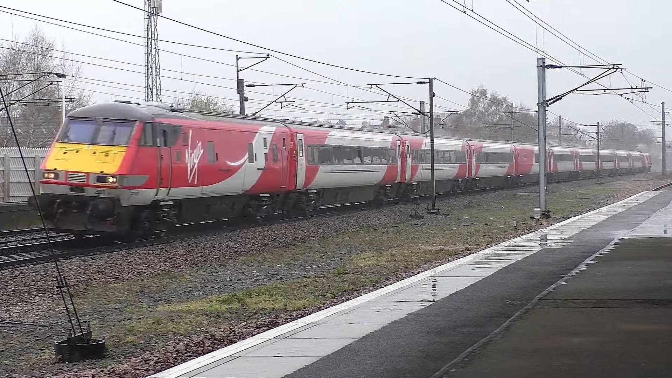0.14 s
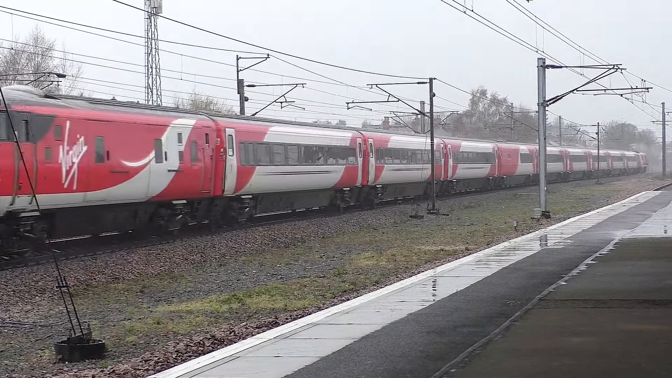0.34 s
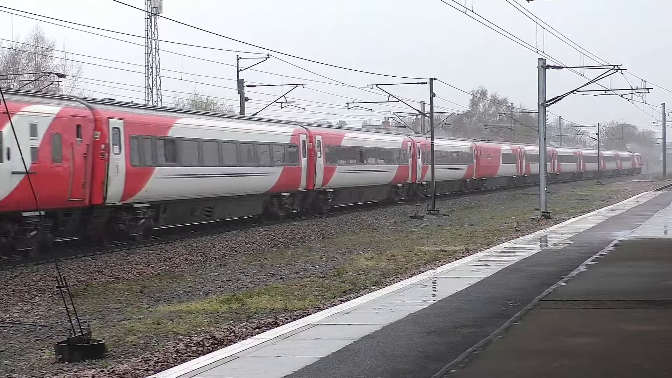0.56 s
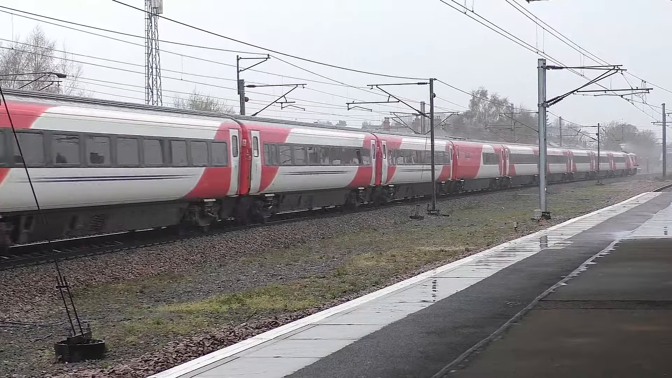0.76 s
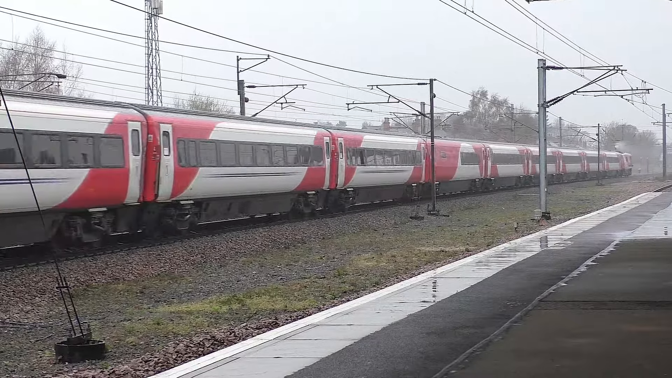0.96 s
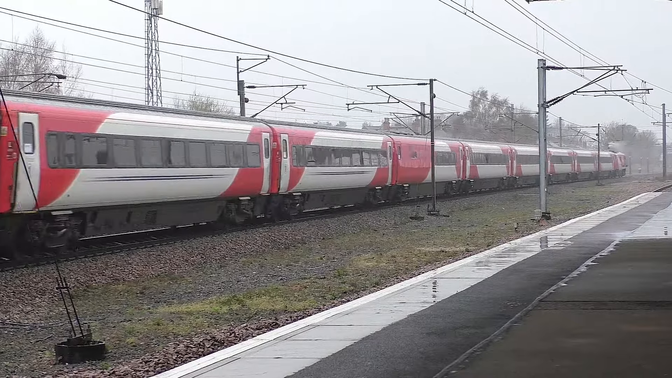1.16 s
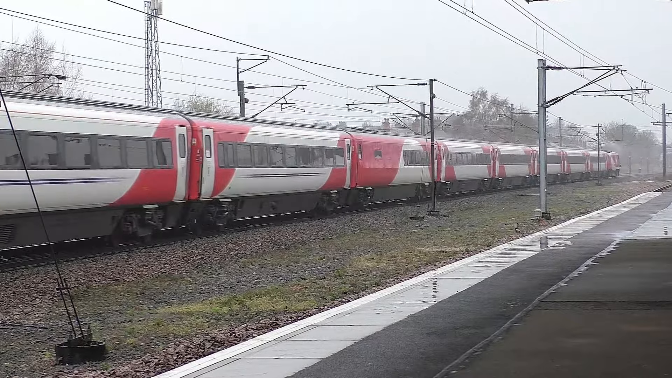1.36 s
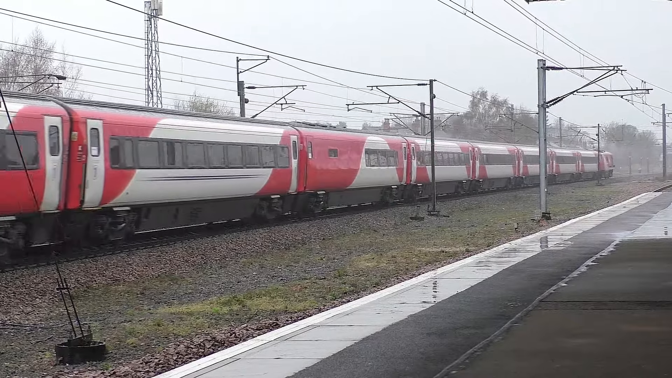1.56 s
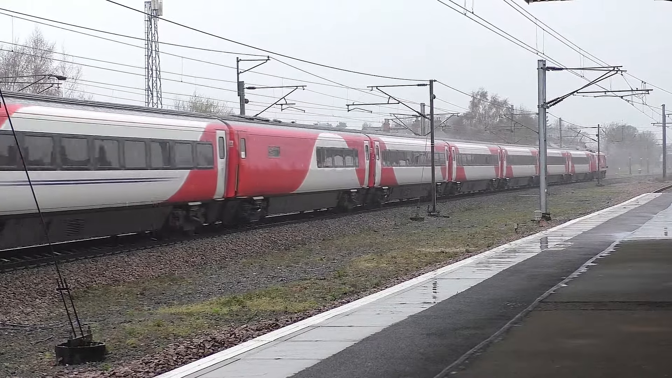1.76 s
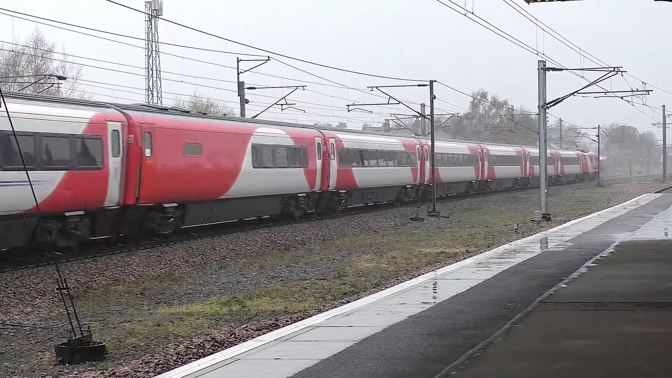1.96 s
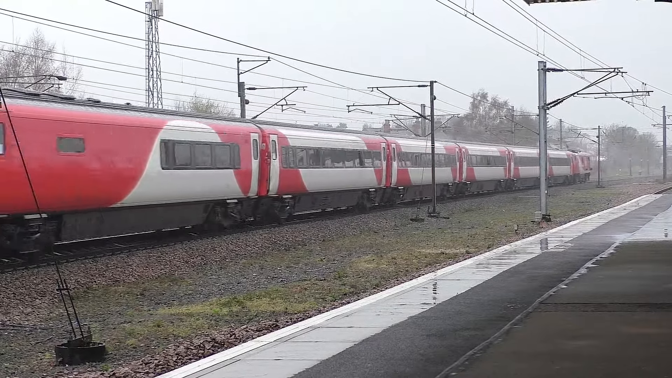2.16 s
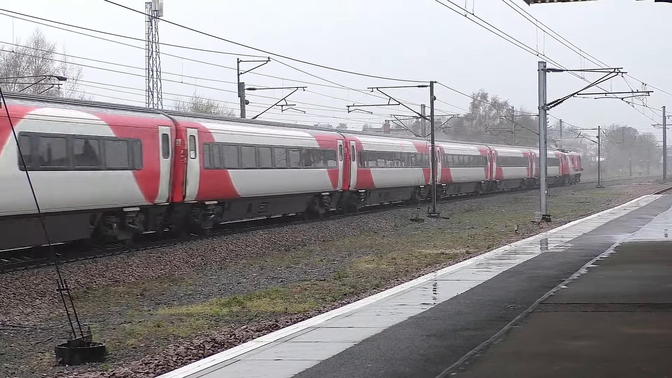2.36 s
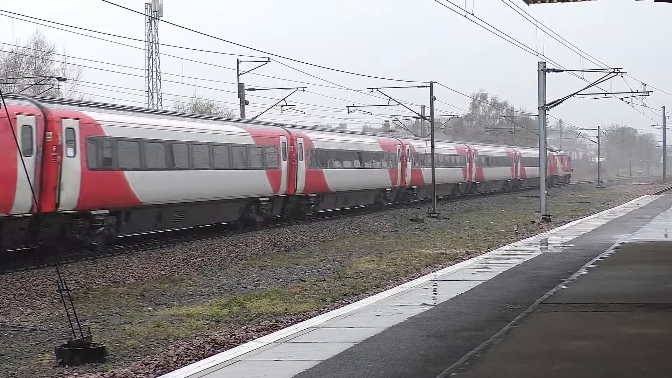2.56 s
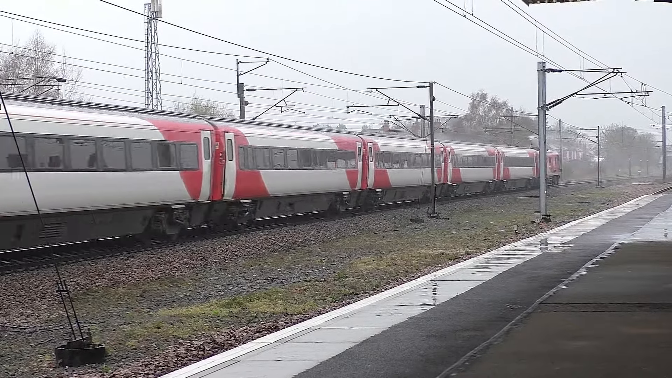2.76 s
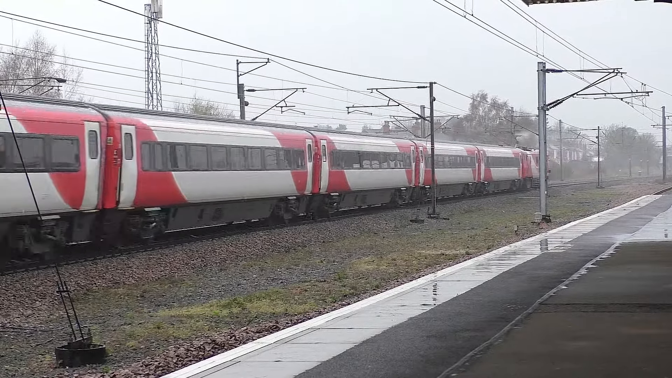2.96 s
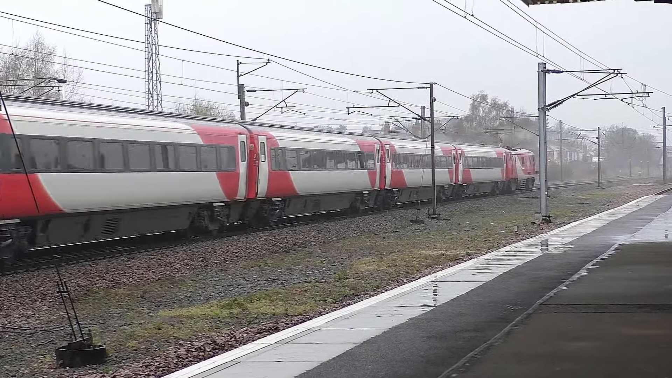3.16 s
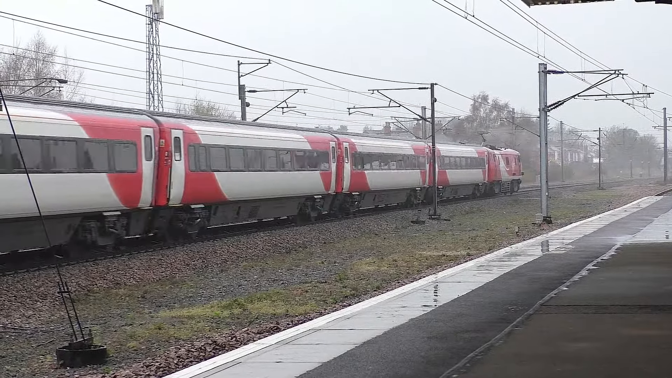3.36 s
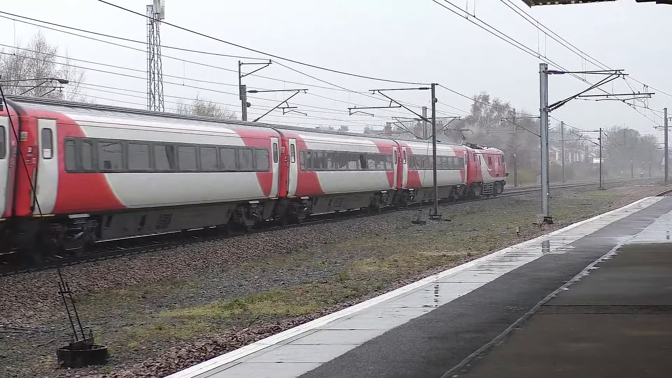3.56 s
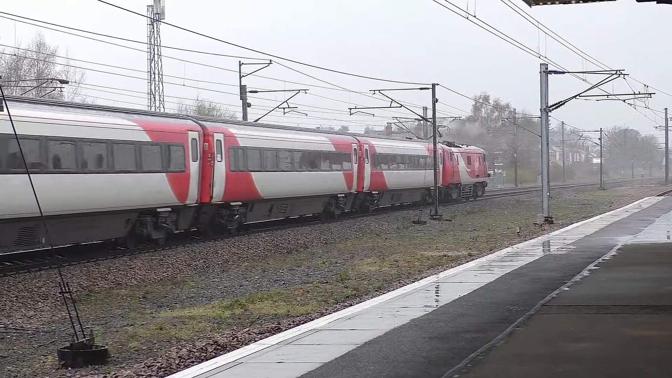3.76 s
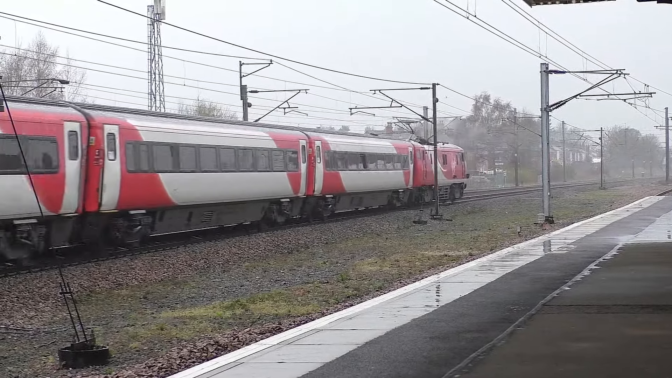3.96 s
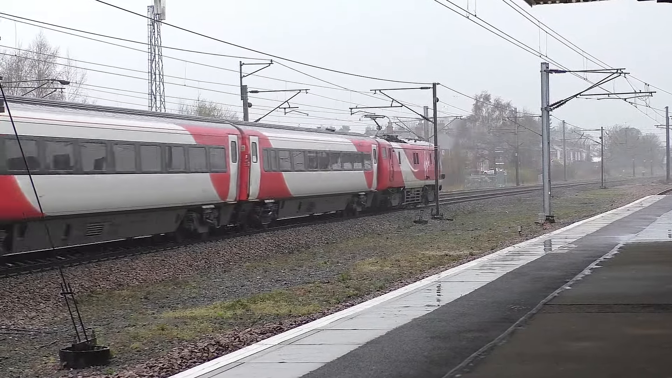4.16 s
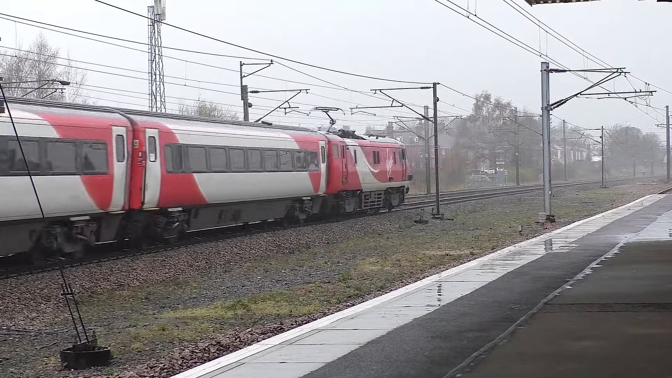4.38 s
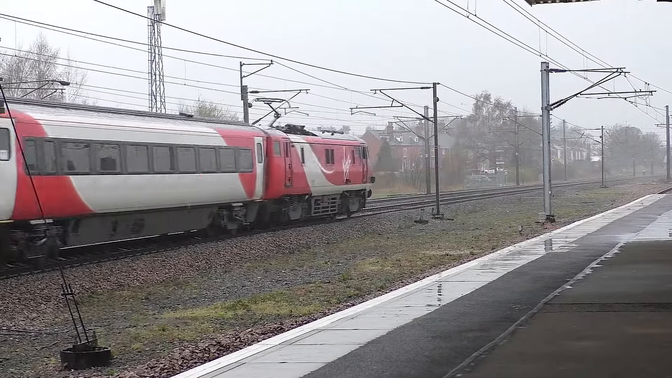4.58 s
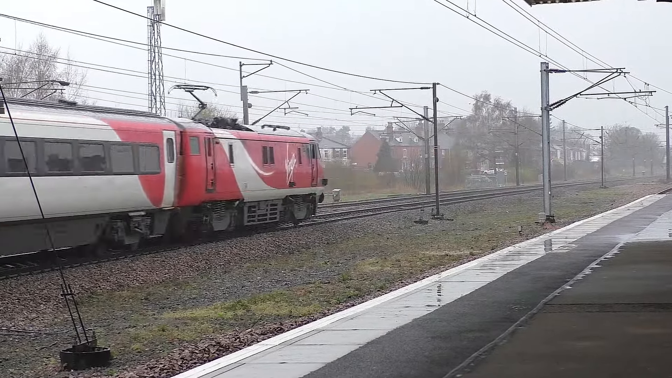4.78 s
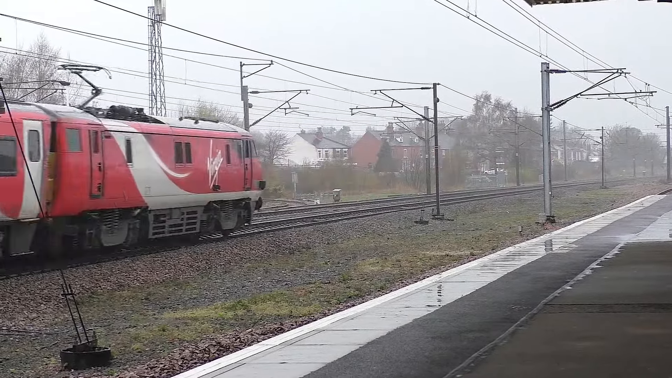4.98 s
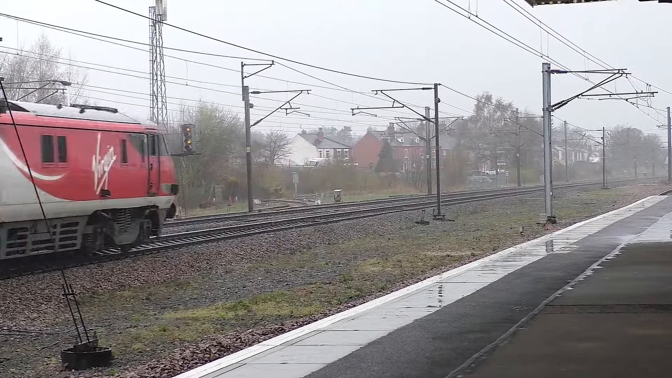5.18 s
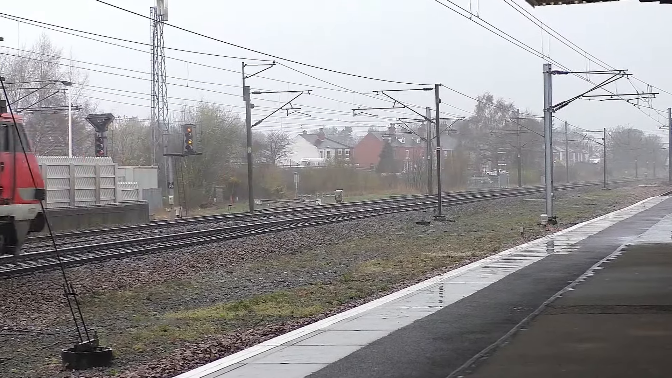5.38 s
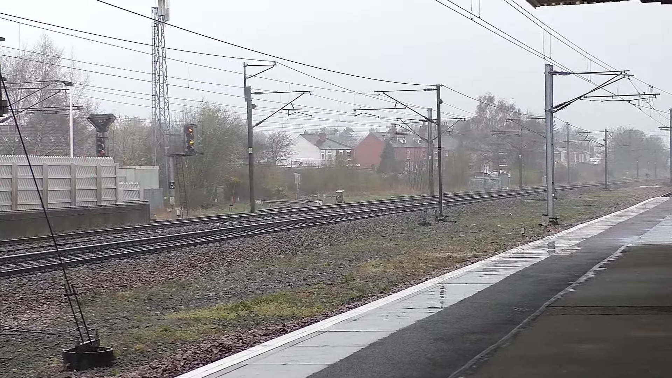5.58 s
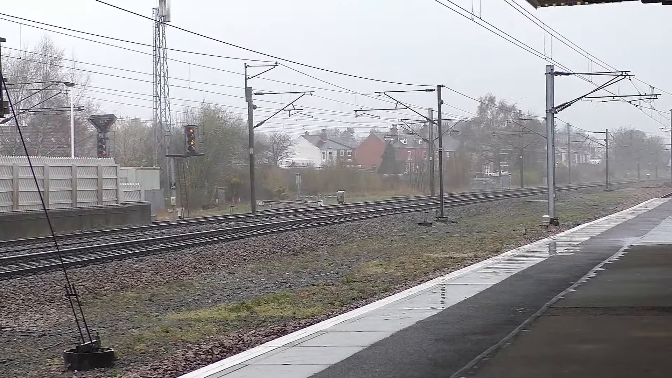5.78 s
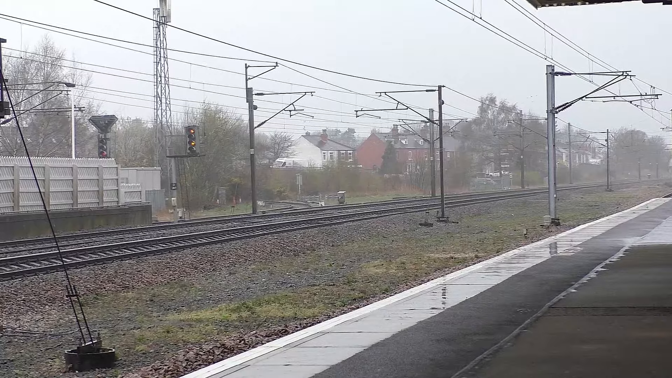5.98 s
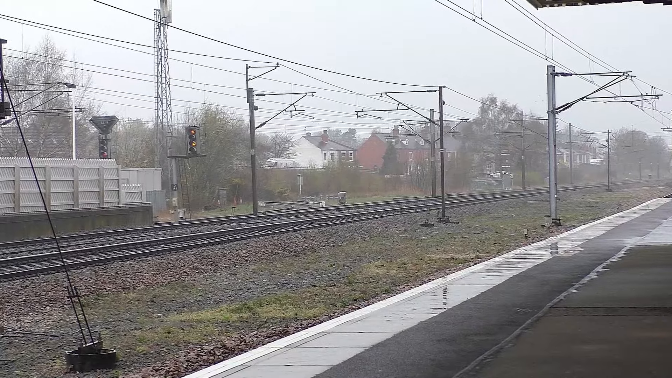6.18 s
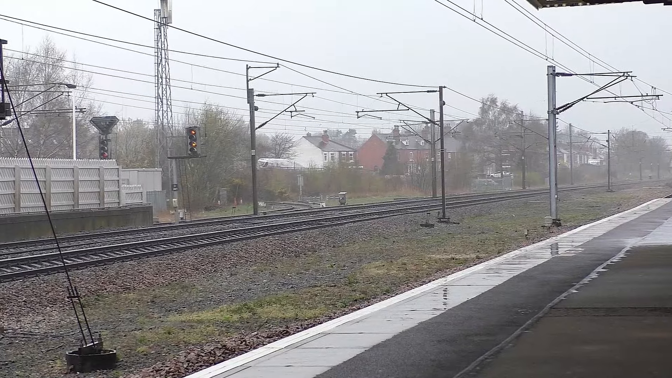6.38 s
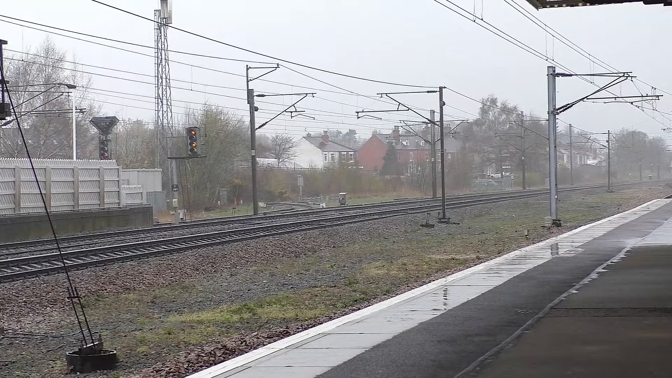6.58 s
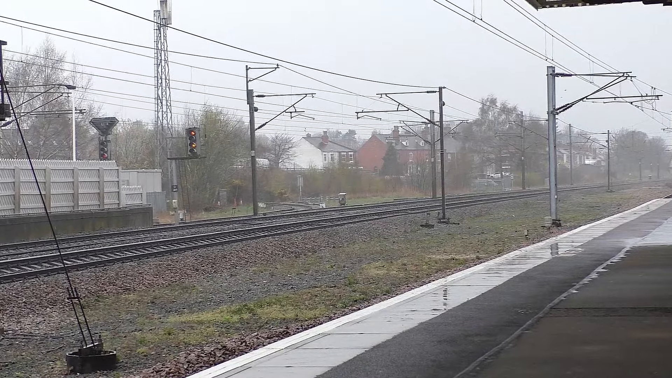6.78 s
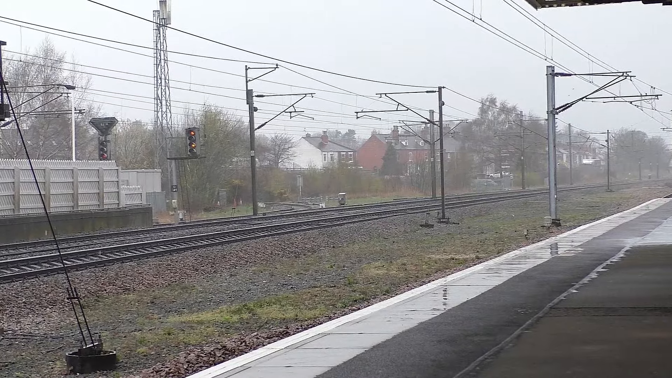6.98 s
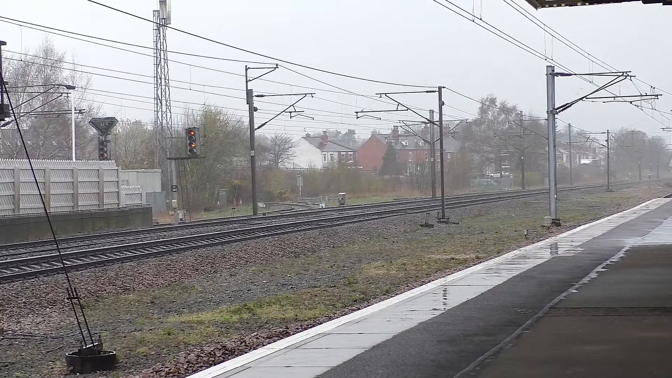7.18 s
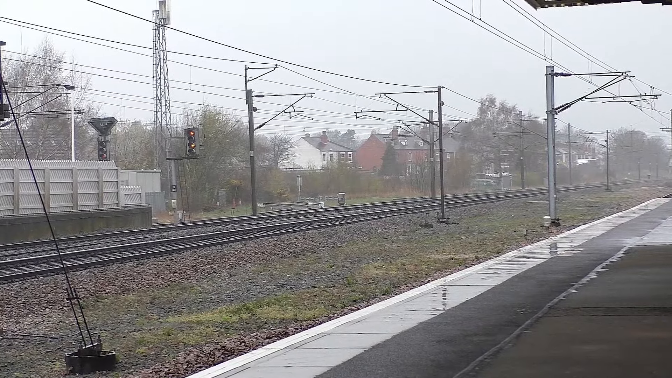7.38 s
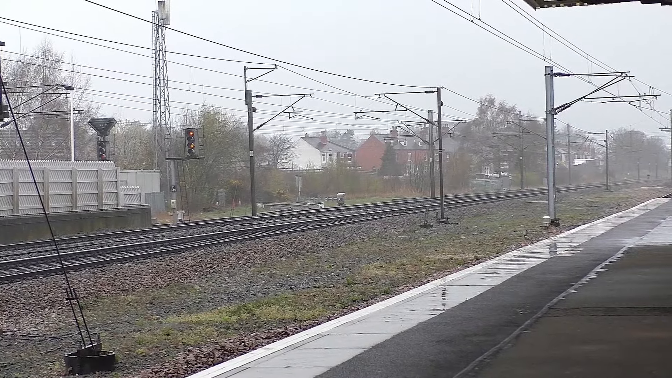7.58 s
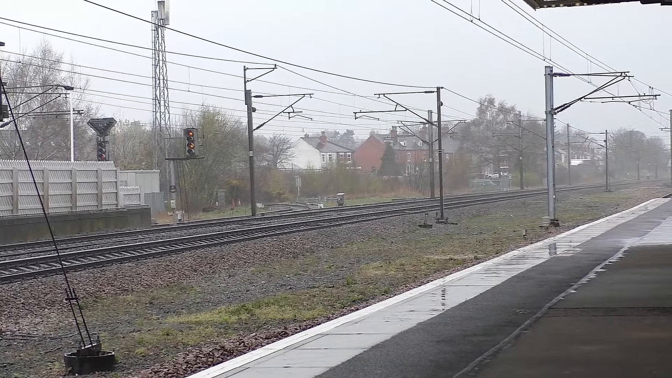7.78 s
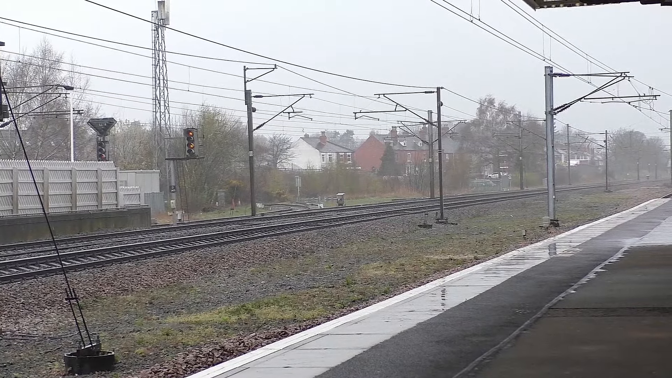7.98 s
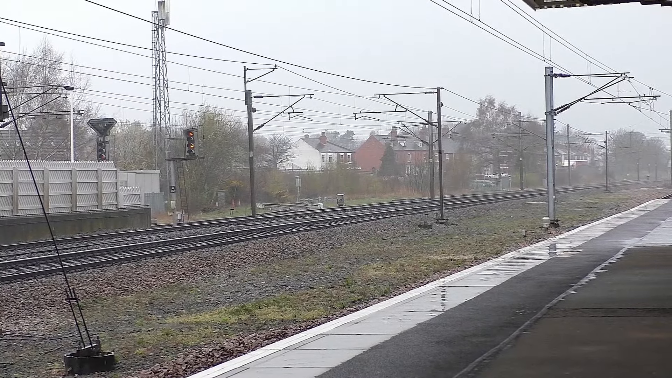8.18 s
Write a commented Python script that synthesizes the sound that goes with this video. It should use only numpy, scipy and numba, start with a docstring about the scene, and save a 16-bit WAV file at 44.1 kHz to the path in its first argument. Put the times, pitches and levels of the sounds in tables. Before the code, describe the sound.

Heard from an open station platform, a fast train approaches and passes with a loud roar of rails and a low rush of air. Spray hisses while the wheels sing in overlapping metallic tones that fall as each set goes by. A brief high squeak and a second gust mark the end of the train. The noise then dies down to faint hums over a soft wash of light rain.

```python
"""Light rain falls on a wet platform as an express train bears down, rough contact setting its rails
roaring and its wheels singing. At 1 s the nose passes in a rumble of air; spray hisses, and bogie after
bogie glides down in pitch as it goes by. Under the rear half the near rail holds one note.
At 5.8 s the tail passes with one short squeak and another rush of air, and the train draws away humming."""
import sys
import numpy as np
from scipy import signal
from scipy.fft import rfft, irfft, next_fast_len
from scipy.io import wavfile
from scipy.ndimage import uniform_filter1d
from numba import njit

SR = 44100
rng = np.random.default_rng(int(sys.argv[2]) if len(sys.argv) > 2 else 0)


def master_out(mix):
    """Clip the mix to full scale and print it as 16-bit PCM to the path in sys.argv[1]."""
    frames = np.transpose(np.atleast_2d(mix))
    ceiling = np.clip(frames, -1, 1)
    pcm = np.round(ceiling * 32767).astype(np.int16)
    wavfile.write(sys.argv[1], SR, pcm)


N = 363455
FFT_SIZE = next_fast_len(N)
TIME_S, BIN_HZ = np.arange(N) / SR, np.arange(FFT_SIZE // 2 + 1) * SR / FFT_SIZE
SPEED_M_PER_S, SOUND_M_PER_S, TRACK_M = 46., 343, 27.
NOSE_S, TAIL_S, COACHES_GONE_S = 1, 5.8, 5.13  # when each passes the listener


def undb(db):
    return 10 ** (np.asarray(db) / 20)


def unit_rms(x):
    return x / np.sqrt(np.mean(x ** 2))


def curve(times_s, values):
    return np.interp(TIME_S, times_s, values)


def over_hz(table, column=1):
    """A table column at every frequency bin, joined on a log axis."""
    table = np.array(table)
    return np.interp(np.log(BIN_HZ + 1), np.log(table[:, 0] + 1), table[:, column])


def shaped_noise(gain):
    """Two unrelated noises of one spectrum, at unit RMS."""
    white = rfft(rng.standard_normal((2, FFT_SIZE)))
    return unit_rms(irfft(white * gain, FFT_SIZE)[:, :N])


def coloured_noise(spectrum):
    return shaped_noise(undb(over_hz(spectrum)))


@njit
def bandpass(x, hz, width_hz):
    """State-variable filter with unity gain at its moving centre."""
    y = np.empty_like(x)
    for c in range(len(x)):
        band, low = 0., 0.
        for i in range(len(hz)):
            g, damping = np.pi * hz[i] / SR, width_hz / hz[i]
            g += g ** 3 / 3
            v = (band + g * (x[c, i] - low)) / (1 + g * (g + damping))
            band, low = 2 * v - band, low + 2 * g * v
            y[c, i] = damping * v
    return y


def wander(rate_hz):
    """Smoothed random steps with a spread near 1."""
    hold = int(SR / rate_hz)
    steps = np.repeat(rng.standard_normal(N // hold + 1), hold)
    return 1.46 * uniform_filter1d(uniform_filter1d(steps, hold), hold)[:N]


def low_cut(x, hz):
    return signal.sosfilt(signal.butter(2, hz, "high", fs=SR, output="sos"), x)


def distance(first_s, last_s):
    """Metres to the nearest part of the stretch of train that passes between two times."""
    return np.hypot(SPEED_M_PER_S * (TIME_S - np.clip(TIME_S, first_s, last_s)), TRACK_M)


def pass_by(nose_db, sides_db, tail_db, ahead, behind):
    """Gain of noise shed by nose, sides and tail; ahead and behind are powers of distance."""
    falloff = curve([NOSE_S, TAIL_S], [ahead, behind])
    parts = ((nose_db, NOSE_S, NOSE_S), (sides_db, NOSE_S, TAIL_S), (tail_db, TAIL_S, TAIL_S))
    gains = [undb(db) * (TRACK_M / distance(a, b)) ** falloff for db, a, b in parts]
    return np.sqrt(sum(gain ** 2 for gain in gains))


def rain():
    """Light rain on the platform, a steady bright wash."""
    # freq_hz, relative_db
    spectrum = [(1900, -23), (2700, 8), (3400, -1), (4200, -3), (7030, -7), (8630, -25), (9360, -33),
                (12500, -16), (14400, -16), (15500, -26)]
    return undb(-48.5) * coloured_noise(spectrum)


def distant_rumble():
    """A faint, steady low bed."""
    spectrum = [(20, -12), (35, -6), (60, -6), (110, -10), (200, -40)]  # freq_hz, relative_db
    return undb(-72) * coloured_noise(spectrum)


def rail_roar():
    """Rough contact shakes the rails: a broad hump of noise with a firmer, wavering core."""
    # Centre of the roar: time_s, pitch_hz
    centre = [(0, 685), (.4, 690), (1.0, 677), (1.5, 802), (3.2, 802), (5.5, 776), (6.1, 720), (8.24, 724)]
    # Core over hump: time_s, level_db
    core_balance = [(0, -3), (.5, -4.5), (1.1, -2), (5.2, -1), (5.8, -7), (6.4, -2.5), (8.24, -7.5)]
    hz = curve(*np.transpose(centre))
    hump = unit_rms(bandpass(bandpass(rng.standard_normal((2, N)), hz, 960.), hz, 1260.))
    core = unit_rms(bandpass(bandpass(rng.standard_normal((2, N)), hz, 400.), hz, 400.))
    share = undb(curve(*np.transpose(core_balance)) + 1.6 * wander(4.7))
    return low_cut(hump + share * core, hz=190) / np.sqrt(1 + share ** 2)


def wheels():
    """All bogies ring the same modes; distance delays each one, so its pitch falls in passing."""
    # Disc and axle modes: pitch_hz, width_hz, level_db, sideways_beaming
    modes = [(513, 83, -10.5, 0.066), (984, 18, -10.5, 0.071), (1702, 91, -3, 0.2), (2286, 310, -0.5, 0.64),
             (2786, 66, -3, 0.28), (3405, 340, -10, 4.2), (4850, 130, -7.5, 11), (5480, 330, -16, 20)]
    # Wheel noise between the modes: freq_hz, relative_db
    rolling_spectrum = [(530, -33), (900, -10), (1350, -8), (1620, 2), (1990, -1.5), (2360, 1.5),
                        (4500, -24.5), (5850, -21), (9900, -120)]
    # Bogie groups: passing_s, kind, ring_db
    bogies = [(.85, "leading car", -0.5), (1.3, "first coach", 1), (1.75, "coach", 3), (2.2, "coach", 3),
              (2.65, "coach", 2.5), (3.2, "coach", 3.5), (3.7, "coach", -1), (4.2, "coach", 1.5),
              (4.7, "coach", 0.5), (5.15, "coach", 1), (5.55, "engine front", 1), (5.9, "engine rear", -2)]
    # Voicing of each kind of bogie: level_db for each mode in turn
    voicing = {"leading car": (10.5, -18, 6, -6, -18, 7, -4, -18),
               "first coach": (-10, -16, 4, 9, 1, 9, -14, -13),
               "coach": (-21, -7, 3.5, 3.5, -1.5, 4.5, -8, -10),
               "engine front": (-11, -2, 4, 2, 0.5, -11, -8, -2),
               "engine rear": (8, 11, -9, 0, -22, -23, -12, -8)}
    rings = [undb(db) * shaped_noise(1 / (1 + (2 * (BIN_HZ - hz) / width_hz) ** 2))
             for hz, width_hz, db, _ in modes]
    rolling = undb(5) * coloured_noise(rolling_spectrum)
    song, power = 0, 0
    for k, (passing_s, kind, ring_db) in enumerate(bogies):
        range_m = distance(passing_s, passing_s)
        facing = TRACK_M / range_m  # cosine of the angle off the axle
        ringing = sum(undb(ring_db + db) * facing ** beaming * ring
                      for db, ring, (*_, beaming) in zip(voicing[kind], rings, modes))
        at_rest = np.roll(ringing + rolling, k * N // len(bogies), axis=1)  # its own stretch of noise
        sent_s = abs(TIME_S - (range_m - TRACK_M) / SOUND_M_PER_S)
        weight = facing ** 1.62
        song += weight * np.array([np.interp(sent_s, TIME_S, x) for x in at_rest])
        power += weight ** 2
    # The weights only balance the bogies against each other.
    return unit_rms(low_cut(song / np.sqrt(power), hz=150))


def sliding_tones(notes, base_width_hz, width_share=0):
    """Narrow bands of noise that swell, slide and fade."""
    noise, tones = rng.standard_normal((2, N)), np.zeros((2, N))
    waver = 1 + .004 * wander(14)
    for start_s, end_s, first_hz, last_hz, peak_db in notes:
        i, j = max(int(start_s * SR), 0), min(int(end_s * SR), N)
        hz = np.linspace(first_hz, last_hz, j - i) * waver[i:j]
        width_hz = float(base_width_hz + width_share * first_hz)
        tone = bandpass(bandpass(noise[:, i:j].copy(), hz, width_hz), hz, width_hz)
        tone *= np.sqrt(2 * SR / (np.pi * width_hz))  # to about unit RMS
        swell = np.abs(np.sin(np.pi * (TIME_S[i:j] - start_s) / (end_s - start_s)))
        tones[:, i:j] += undb(peak_db) * swell * tone
    return tones


def singing():
    """Here and there one wheel or rail sings out of the roar."""
    # Sung notes: start_s, end_s, first_hz, last_hz, peak_db
    notes = [(-.4, .55, 578, 557, -23), (0, 0.63, 1630, 1600, -29), (.5, 0.78, 815, 770, -19.5),
             (-.1, .9, 2600, 2555, -28.5), (.85, 1.2, 2320, 2290, -26), (3.1, 3.35, 1620, 1590, -25),
             (2.75, 3.1, 1800, 1720, -27), (4.4, 4.75, 2380, 2280, -27), (.1, 1.35, 3124, 3080, -29),
             (.3, 1.26, 1860, 1840, -26), (.5, 1.05, 2500, 2380, -24), (.45, 1.03, 615, 596, -23),
             (1.1, 1.48, 1700, 1680, -23.5), (1.4, 2.4, 5900, 5350, -40), (1.75, 2.02, 706, 727, -24),
             (1.8, 2.55, 2000, 1734, -27.5), (2.05, 2.3, 2650, 2380, -32), (2.15, 2.5, 5260, 4700, -31.5),
             (2.2, 2.55, 3700, 3520, -29.5), (2.55, 3.27, 2900, 2510, -28), (2.497, 3.02, 778, 820, -26.5),
             (2.75, 3.34, 4740, 4750, -35), (2.9, 3.3, 5200, 5260, -33), (2.95, 3.3, 3120, 3060, -29),
             (3.05, 3.3, 2300, 2130, -25), (3.25, 3.6, 2260, 2000, -26), (3.15, 3.443, 830, 884, -21.5),
             (3.6, 3.9, 1670, 1660, -24), (4.05, 4.6, 1665, 1630, -28), (4.1, 4.5, 4130, 3950, -29),
             (4.3, 5, 3120, 3050, -32), (5, 5.3, 2610, 2280, -24), (5.15, 5.7, 1900, 1620, -24),
             (5.1, 5.9, 4740, 4720, -37), (5.62, 5.946, 820, 810, -25), (5.65, 5.9, 960, 920, -25),
             (5.4, 6.1, 900, 886, -25), (3.1, 3.35, 2800, 3150, -26), (4.15, 4.4, 2780, 2720, -27),
             (5.05, 5.35, 2800, 2300, -29), (6.2, 6.9, 340, 343, -39.5), (7, 7.5, 443, 460, -37.5),
             (7.55, 8.24, 1470, 1450, -43)]
    return sliding_tones(notes, base_width_hz=43, width_share=.016)


def hums():
    """Narrower tones come and go at either end of the train."""
    # Hummed notes: start_s, end_s, first_hz, last_hz, peak_db
    notes = [(-.4, .45, 578, 570, -25), (.4, 1.15, 1850, 1830, -29), (6.4, 7.3, 710, 700, -35),
             (4.7, 5.95, 412, 403, -30.5), (5.2, 5.75, 1690, 1660, -26), (5.6, 6.3, 480, 478, -28),
             (6.1, 7.5, 866, 855, -32), (6.5, 7.9, 952, 940, -38), (6.9, 8.3, 770, 760, -39),
             (7.3, 8.6, 864, 865, -42)]
    return sliding_tones(notes, base_width_hz=29)


def wet_hiss():
    """A flickering hiss whose lowest band leaves with the coaches."""
    # Hiss colour: freq_hz, relative_db
    spectrum = [(1650, -22.5), (2800, 0.5), (4350, -5.5), (5550, -6), (7590, -14.5), (9000, -31),
                (11700, -58), (19800, -120)]
    hiss = coloured_noise(spectrum)
    low_band = bandpass(hiss, np.full(N, 3150.), 940.)
    gone = 1 - TRACK_M / distance(0, COACHES_GONE_S)
    return undb(.99 * wander(7.4)) * (hiss - gone * low_band)


def high_sizzle(loss_db_per_m=.07):
    """A faint high sizzle that fades as the train draws away."""
    # Sizzle colour: freq_hz, relative_db
    spectrum = [(5000, -15), (8500, 5.5), (9420, 1), (13000, -3.5), (14600, -10), (15500, -29)]
    away_m = distance(NOSE_S, TAIL_S) - TRACK_M
    return undb(.8 * wander(30) - loss_db_per_m * away_m) * coloured_noise(spectrum)


def ground_rumble():
    """Low end that arrives well ahead of the nose and drops away behind the train."""
    # Rumble colour: freq_hz, relative_db
    spectrum = [(12, -52), (20, -48), (50, -14), (68, -12), (84, -2.5), (113, -7), (160, 0), (210, -34),
                (350, -120)]
    gain = pass_by(nose_db=-44.5, sides_db=-53.5, tail_db=-70, ahead=.4, behind=7)
    return gain * coloured_noise(spectrum)


def air_rush():
    """Air rumbles round the train, most at nose and tail."""
    # Rush colour: freq_hz, relative_db
    spectrum = [(71, -51), (120, -70), (178, -16), (227, -11.5), (269, -6.5), (306, -7), (550, -7),
                (720, -30), (1210, -120)]
    gain = pass_by(nose_db=-29.5, sides_db=-34, tail_db=-30, ahead=2.5, behind=2.5)
    return gain * coloured_noise(spectrum)


def rail_note(pitch_hz=1708., width_hz=62., start_s=3.87):
    """The near rail holds one pitch under the rear coaches and dies quickly after them."""
    note = unit_rms(bandpass(rng.standard_normal((2, N)), np.full(N, pitch_hz), width_hz))
    nearness = (TRACK_M / distance(start_s, COACHES_GONE_S)) ** 7.4
    return note * nearness * undb(-10 + 3.5 * wander(4.29))


def squeak(fade_db_per_s=900):
    """The last vehicle squeaks: two rough chirps run together, left of centre."""
    # Chirps: peak_s, pitch_hz, peak_db
    chirps = [(5.752, 7360, -26.5), (5.795, 7100, -22.5)]
    times_s, hz, _ = np.transpose(chirps)
    tone = unit_rms(bandpass(rng.standard_normal((1, N)), curve(times_s, hz), 120.))
    swell = sum(undb(db - fade_db_per_s * abs(TIME_S - peak_s)) for peak_s, _, db in chirps)
    return tone * swell * undb([[3.], [-3.]])


def stereo_image(pair):
    """The first noise reaches both microphone ports; the second makes them differ."""
    # Left port against right: freq_hz, likeness (0-1), left_lead_rad, left_minus_right_db
    ports = [(100, 0.95, 0.0, -1.8), (300, 0.93, -0.1, -2.3), (600, 0.88, 0.3, -2.9),
             (900, 0.79, 0.8, -3.3), (1300, 0.69, 0.9, -0.8), (1800, 0.54, 0.9, -0.4),
             (2200, 0.24, 0.6, 0.0), (2600, 0.5, -0.0, -0.2), (3200, 0.63, 0.0, 0.0),
             (4200, 0.74, 0.3, -0.8), (5400, 0.55, 0.9, -1.8), (6400, 0.27, 1.3, -0.3),
             (7400, 0.28, 0.9, -0.4), (9500, 0.54, 3.1, 0.8), (13000, 0.08, 6.4, 0.8),
             (15000, 0.14, 6.3, -1.0)]
    common, difference = rfft(pair, FFT_SIZE)
    likeness = over_hz(ports)
    mid = np.sqrt((1 + likeness) / 2) * common
    side = np.sqrt((1 - likeness) / 2) * difference
    skew = np.exp(.5j * over_hz(ports, column=2)) * undb(over_hz(ports, column=3) / 2)
    return irfft([(mid + side) * skew, (mid - side) / skew], FFT_SIZE)[:, :N]


def scene():
    """Mix the pass-by, leaning slightly right until the nose arrives."""
    # Fader moves: time_s, roar_db, wheel_db, hiss_db
    faders = [(0.0, -18, -29, -34.5), (0.07, -18.5, -24, -32), (0.69, -13, -19, -24.5),
              (1.12, -17, -17, -23.5), (1.97, -17, -16, -22), (2.35, -18.5, -17, -25),
              (2.61, -19.5, -17.5, -24.5), (2.9, -17, -16, -22), (3.1, -17.5, -15.5, -21.5),
              (3.21, -16, -13, -21), (3.32, -18.5, -15, -23), (3.49, -19, -16, -22.5),
              (3.97, -19, -16.5, -23.5), (4.27, -17, -15, -20.5), (4.68, -17.5, -16.5, -23),
              (5.05, -17.5, -16, -22.5), (5.44, -15, -15.5, -23), (5.48, -16.5, -18.5, -23.5),
              (5.66, -14.5, -17.5, -23), (5.78, -13, -17.5, -21.5), (5.92, -15, -19, -24),
              (6.1, -16, -20, -25), (6.72, -24, -24.5, -35), (6.86, -24, -29, -39), (8.03, -33, -34.5, -51),
              (8.24, -32.5, -37.5, -53)]
    times_s, *levels = np.transpose(faders)
    roar_db, wheel_db, hiss_db = (curve(times_s, db) for db in levels)
    mix = undb(roar_db) * rail_roar() + undb(wheel_db) * (wheels() + rail_note())
    mix += air_rush() + ground_rumble()
    mix += undb(hiss_db) * wet_hiss() + undb(hiss_db - 16) * high_sizzle()
    mix += rain() + singing() + hums() + distant_rumble()
    pan_db = curve([0, NOSE_S], [-1.5, 0])  # left minus right
    return stereo_image(mix) * undb([pan_db / 2, -pan_db / 2]) + squeak()


def record(dry):
    """Hard-limit the highest peaks and cut the top above 15.5 kHz."""
    high_cut = signal.ellip(10, .2, 80, 15500, fs=SR, output="sos")
    return signal.sosfilt(high_cut, np.clip(dry, -.97, .97))


dry = scene()
out = record(dry)
master_out(out)
```